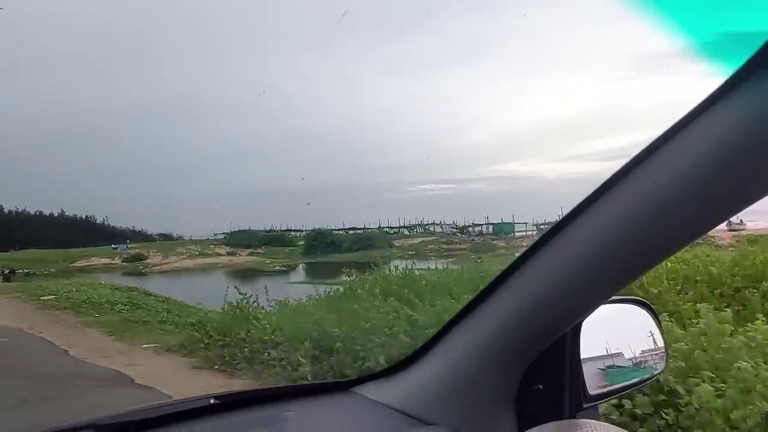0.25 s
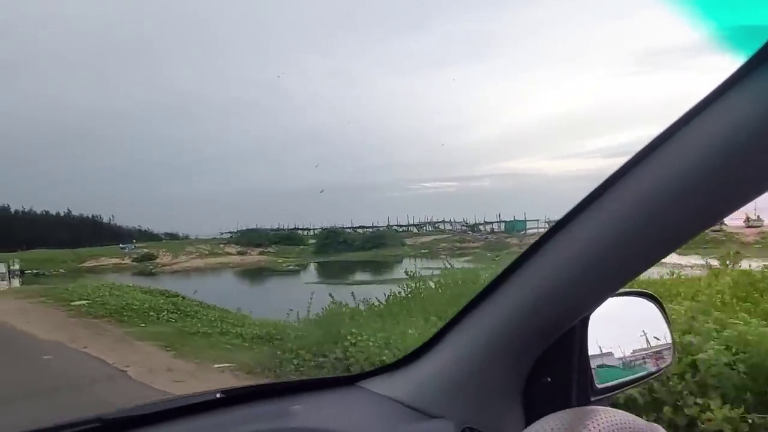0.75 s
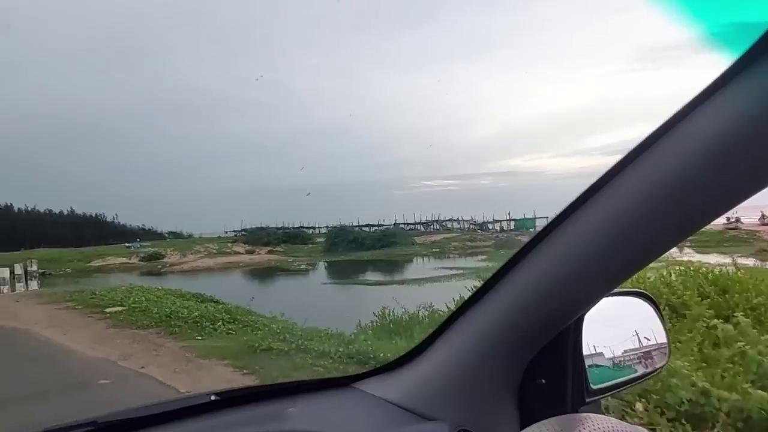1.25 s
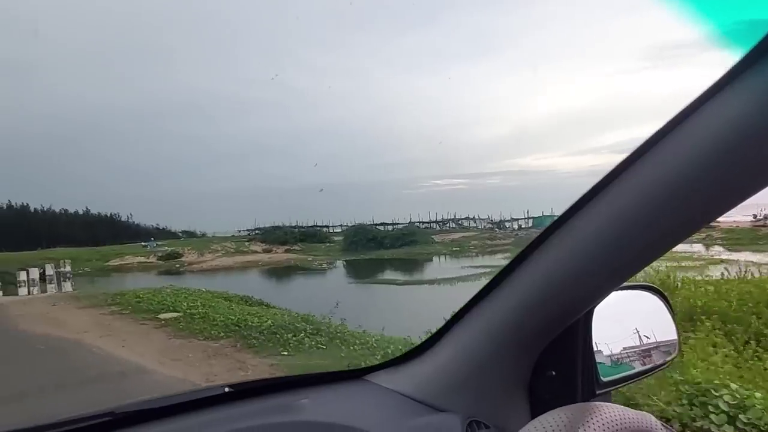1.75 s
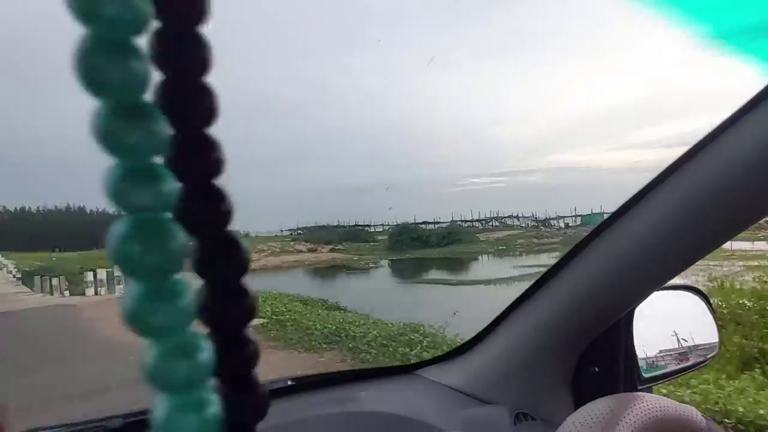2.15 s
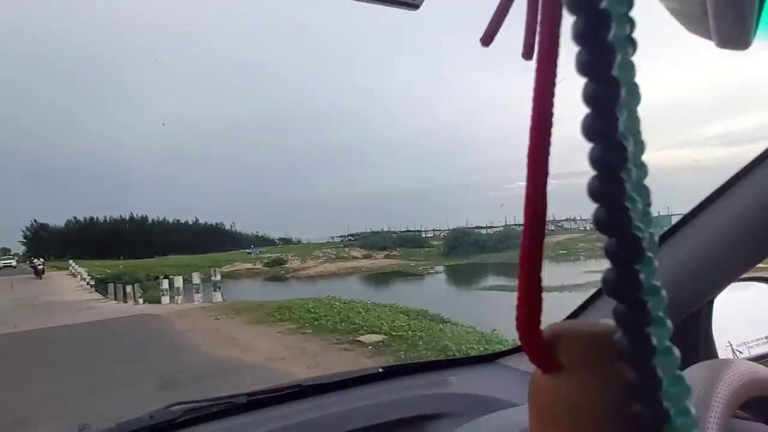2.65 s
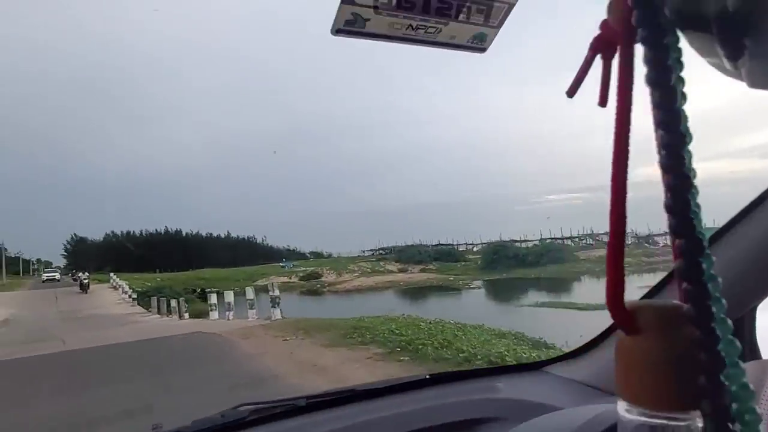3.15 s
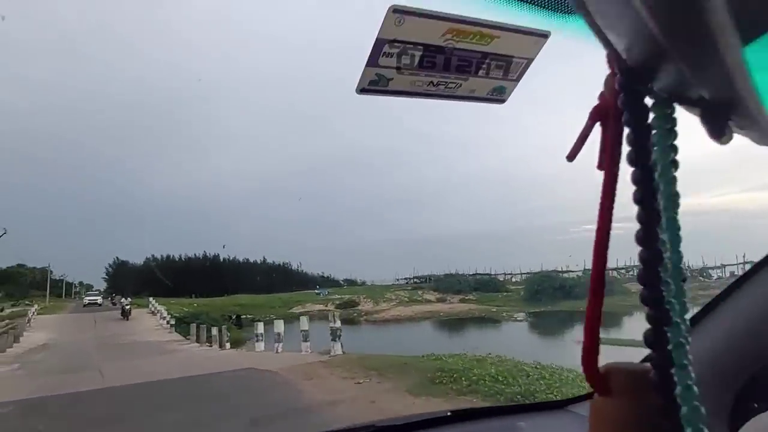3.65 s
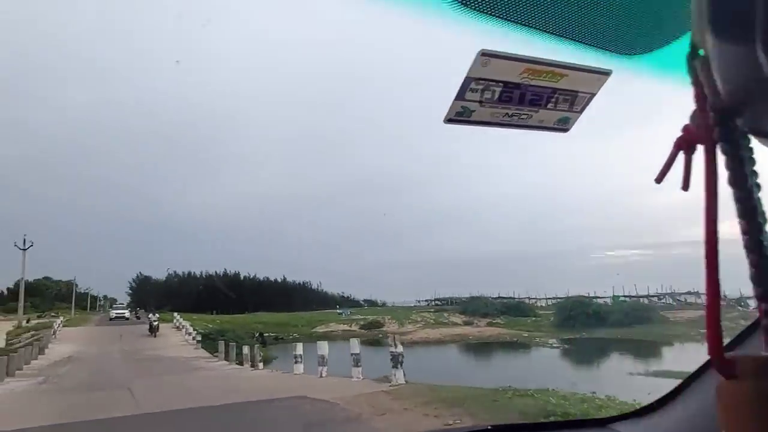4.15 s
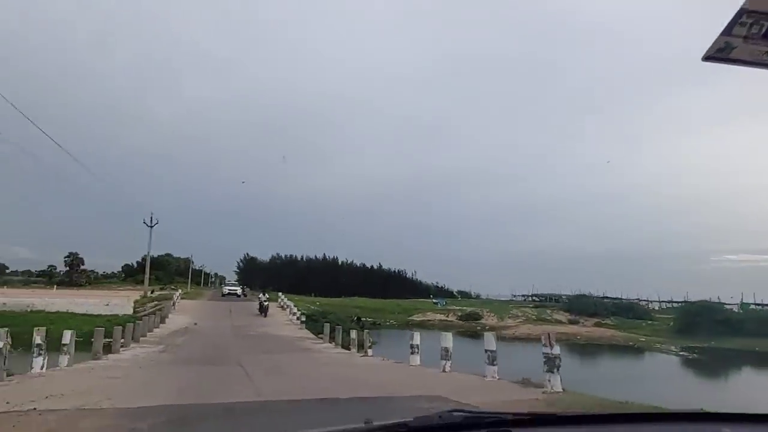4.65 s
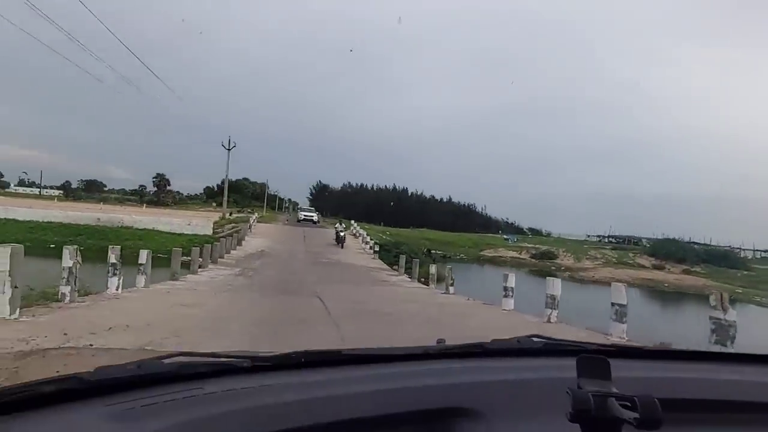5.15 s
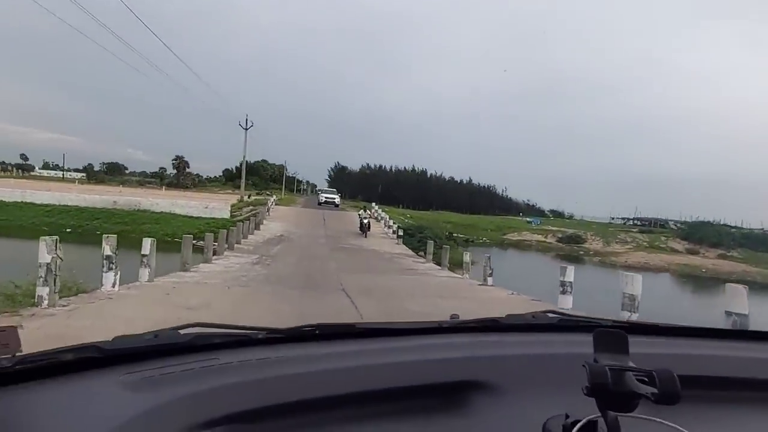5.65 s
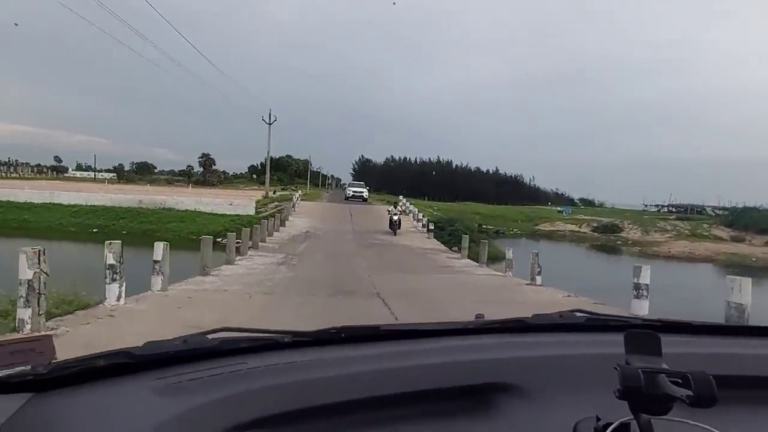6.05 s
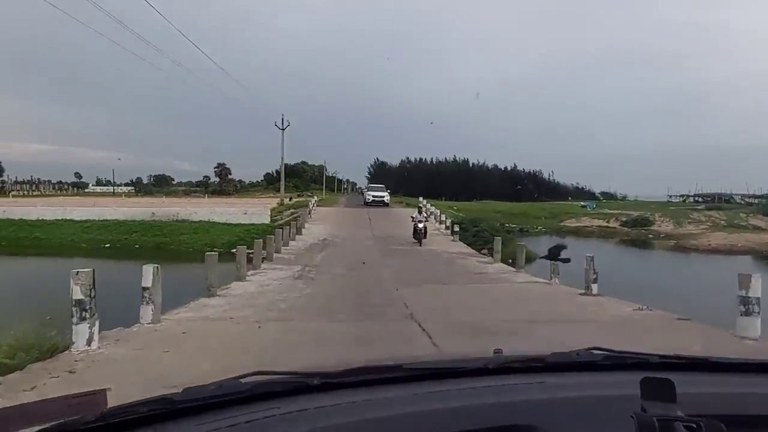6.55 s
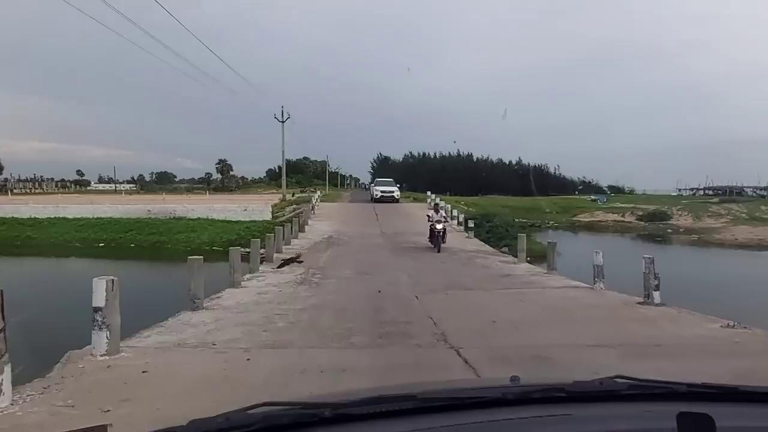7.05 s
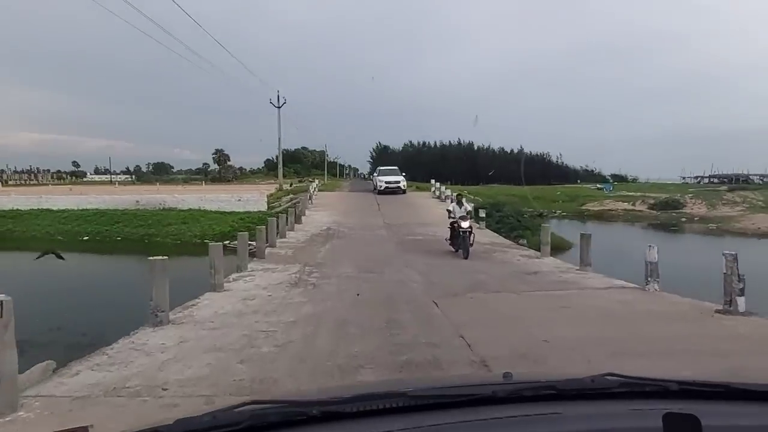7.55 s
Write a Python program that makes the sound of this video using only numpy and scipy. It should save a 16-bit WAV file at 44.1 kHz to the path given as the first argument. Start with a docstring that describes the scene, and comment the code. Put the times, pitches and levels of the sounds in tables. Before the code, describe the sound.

Inside a car rolling slowly onto a causeway, a deep engine drone sags in pitch under steady road rumble and faint air hiss, with barely audible soft chirps early. Around two and a half seconds a loud thump and rattle jolts the hand-held phone, and more knocks follow for over a second. The cabin then settles, the rumble returns stronger, and the engine climbs among dull bumps and brighter hiss.

```python
"""Inside a car rolling slowly along a causeway, heard by a hand-held phone.
Throughout, the engine drones in sines at multiples of its firing rate; the pitch sags, then climbs late on.
Filtered noise makes road rumble, tyre roar and air hiss. Soft sine chirps and a thin sizzle of hiss come
early; then knocks jolt the phone in falling thumps with rattle and crack, thinning out after the middle.
Trim ticks and rustles are puffs of noise; from past the middle a few faint whistles slide or hold."""
import sys
import numpy as np
from scipy import signal
from scipy.fft import rfft, irfft, next_fast_len
from scipy.io import wavfile
from scipy.ndimage import uniform_filter1d

SR = 44100
rng = np.random.default_rng(int(sys.argv[2]) if len(sys.argv) > 2 else 0)


def digitize_waveform(pressure):
    """Quantize a signal to 16-bit integers and store it at the path in sys.argv[1].

    Rows of a 2-D input are taken as channels; values are limited to [-1, 1].
    """
    field = np.atleast_2d(pressure).T
    bounded = np.clip(field, -1, 1)
    quanta = np.round(bounded * 32767).astype(np.int16)
    wavfile.write(sys.argv[1], SR, quanta)


N = 343539
T = np.arange(N) / SR  # time [s]

# course of the cabin noise, before each source's own share of it:
# (time [s], level [dB], extra treble level [dB])
CABIN_COURSE = [(0, 1.5, 0), (.55, -1, -0.5), (1.1, -0.5, 0.5), (2.45, -2, 3.5), (2.9, -5.5, 0.5),
                (3.5, -4.5, 1), (4.1, -5.5, -1), (4.85, -3.5, 0), (5.3, 0.5, 1.5), (6.4, 1.5, -1),
                (6.7, 1.5, 3.5), (7.4, 2, 5), (7.79, 3, 7.5)]


def undb(db):
    """Decibels to gain."""
    return 10 ** (np.asarray(db) / 20)


def walk(rate):
    """Random levels, rate of them per second, smoothed twice into slopes; spread near 1."""
    hold = int(SR / rate)
    steps = np.repeat(rng.standard_normal(N // hold + 1), hold)
    return 1.136 * uniform_filter1d(uniform_filter1d(steps, hold), hold)[:N]


def band(x, hz, width_hz):
    """Band-pass around a centre, its edges kept within a safe range."""
    low_hz = max(hz - width_hz / 2, 0.3 * hz)
    high_hz = min(hz + width_hz / 2, 0.45 * SR)
    return signal.sosfilt(signal.butter(2, [low_hz, high_hz], "bandpass", fs=SR, output="sos"), x)


def resonance(hz, mode_hz, width_hz, lift_db):
    """Lift in dB of a resonance, falling to half its dB at the edges of its width."""
    return lift_db / (1 + (2 * (hz - mode_hz) / width_hz) ** 2)


def add(out, s, sound):
    """Mix a short sound in at a time in seconds."""
    i = int(s * SR)
    out[i:i + len(sound)] += sound[:N - i]


def cabin_level():
    """Slow level course of the noise in the cabin, dB."""
    return np.interp(T, *np.transpose(CABIN_COURSE)[:2])


def engine(wander=0.003, scatter_db=1.5, follows=1.2):
    """Three multiples of the firing rate boom as they cross the cabin's air modes, wavering a little."""
    # engine speed, before its small wander: (time [s], firing rate [Hz])
    firing_rate = [(0, 73.87), (.7, 69.24), (1.4, 66.18), (2.5, 63.48), (3.1, 63.1), (4.7, 63.9),
                   (5.2, 65.23), (6.75, 65.78), (7.5, 72.9), (7.79, 72)]
    # levels of the 1st, 2nd and 3rd multiple away from any boom, before the slow course and scatter [dB]
    multiples_db = (-44.5, -43.5, -54)
    # cabin air modes that lift a multiple passing through them: (centre [Hz], width [Hz], lift [dB])
    air_modes = [(75.5, 8.1, 6), (130.85, 5.4, 11), (196.5, 12, 7.5)]
    hz = np.interp(T, *np.transpose(firing_rate))
    phase = 2 * np.pi * np.cumsum(hz * (1 + wander * walk(12))) / SR
    course_db = follows * cabin_level()
    out = np.zeros(N)
    for multiple, db in enumerate(multiples_db, 1):
        boom_db = sum(resonance(multiple * hz, *mode) for mode in air_modes)
        level_db = db + boom_db + course_db + scatter_db * walk(14)
        out += np.sqrt(2) * undb(level_db) * np.sin(multiple * phase + multiple - 1)
    return out


def cabin(road_db=-33.5, air_db=-69, swell_db=0.7, flicker_db=1.5):
    """Road and air noise, coloured by cabin resonances, in bands that swell together and flicker alone."""
    # colour of the road noise, set to its level below: (frequency [Hz], relative density [dB])
    road_colour = [(12, -37.5), (20, -8), (70, 3.5), (103, -4), (139, -1.5), (163, -6), (204, -6),
                   (230, -11.5), (374, -18), (406, -18), (608, -22.5), (910, -26), (1340, -34.5),
                   (1450, -33.5), (2500, -41), (3250, -76), (5500, -120)]
    # colour of the air hiss, set to its level below: (frequency [Hz], relative density [dB])
    air_colour = [(1500, -31), (2500, -10.5), (2820, -2.5), (3100, -7), (3540, -12.5), (4160, -10.5),
                  (4600, -12), (5700, -8.5), (6100, -13), (6400, -20.5), (7100, -25), (8400, -25.5),
                  (9300, -23), (10100, -26), (15700, -29.5)]
    # cabin resonances: (centre [Hz], width [Hz], lift [dB])
    panels = [(294.5, 16, 5), (342, 13, 3), (632, 12, 5), (721, 30, 5.5), (1058, 10, 5.5), (1324, 20, 7),
              (4250, 66, 2), (4900, 110, 3.5)]
    # centres of rumble, tyre roar, air hiss and top hiss [Hz]
    range_hz = (60, 600, 4000, 10000)
    # how far those four follow the level of the course [share]
    level_share = (0.83, 1.22, 0.89, 1.3)
    # how far those four follow its extra treble level [share]
    treble_share = (0.32, 0, 0.97, 0.061)
    size = next_fast_len(N)
    octave = np.log2(np.maximum(np.arange(size // 2 + 1) * SR / size, 1))
    colour = 0
    for table, db in ((road_colour, road_db), (air_colour, air_db)):
        table_hz, density_db = np.transpose(table)
        shape = undb(np.interp(octave, np.log2(table_hz), density_db))
        colour = np.hypot(colour, undb(db) * shape / np.sqrt(np.mean(shape ** 2)))
    for panel in panels:
        colour = colour * undb(resonance(2 ** octave, *panel))
    noise = colour * rfft(rng.standard_normal(size))

    s, level_db, treble_db = np.transpose(CABIN_COURSE)
    range_octave = np.log2(range_hz)
    out, swell = np.zeros(N), walk(5)
    for centre in np.arange(4, 14.6, 0.5):  # octaves above 1 Hz
        overlap = np.clip(1 - 2 * abs(octave - centre), 0, 1)  # neighbouring bands cross-fade
        rise_db = np.interp(centre, range_octave, level_share) * level_db
        rise_db = rise_db + np.interp(centre, range_octave, treble_share) * treble_db
        moving_db = np.interp(T, s, rise_db) + swell_db * swell + flicker_db * walk(11)
        out += undb(moving_db) * irfft(overlap * noise, size)[:N]
    return out


def knocks(glide=0.5, tail=1.64, rattle_db=-26, rattle_ms=14, contact_ms=0.43, crack_ms=1.94):
    """Each blow swings the microphone in a short falling thump, rattles the casing and cracks."""
    # blows on the phone: (time [s], thump peak [dB], settled thump pitch [Hz], rise to the peak [ms],
    # gain of the casing's ring [dB], gain of the crack [dB])
    blows = [(2.5415, 4, 124.6, 3.7, -13, -17.5), (2.584, -14.5, 197, 3.6, -22.5, -28),
             (2.5858, -37, 200, 3.5, -41, -31), (2.6175, -9, 145, 4.6, -29.5, -56),
             (2.656, -19.5, 99, 5.9, -44, -59), (2.7238, -16, 115, 4.3, -44.5, -59),
             (2.7810, -26, 222, 3.2, -40.5, -64), (3.3060, -3.5, 152, 3.1, -18, -33),
             (3.3132, -0.5, 151, 1.7, -38.5, -28.5), (3.3760, -10, 353, 1.6, -20, -40),
             (3.3825, -1.5, 107, 5.5, -34, -49), (3.406, -28, 244, 10.7, -37, -55),
             (3.5495, -10.5, 179.4, 6, -25.5, -52), (3.6685, 2, 140, 2.63, -20, -32),
             (3.672, -46, 200, 3, -36, -38.5), (3.706, -14.5, 204, 5, -42, -58),
             (3.7160, -12.5, 150.5, 6.2, -29, -66), (6.0193, -18.5, 230, 3.1, -27, -38),
             (6.0240, -16.5, 65, 8, -50, -70), (6.0858, -8.5, 191, 1.34, -23.5, -39),
             (7.502, -19.5, 62, 9.8, -29, -49), (7.554, -18, 85, 9.5, -34.5, -40),
             (7.623, -16.5, 100, 7.2, -32, -49)]
    # ringing modes of the casing, before each blow's gain: (frequency [Hz], level [dB], 60 dB decay [s])
    casing_modes = [(56.2, -2.5, 0.38), (314, 2.5, 0.054), (466, 0, 0.025), (679, -3.5, 0.024),
                    (882, -11, 0.019), (1790, -12, 0.018)]
    out, t = np.zeros(N), T[:SR // 8]
    noise = rng.standard_normal((len(blows), 2, len(t)))
    casing = sum(undb(db) * np.sin(2 * np.pi * hz * t) * undb(-60 * t / t60) for hz, db, t60 in casing_modes)
    casing *= 1 - np.exp(-1000 * t / contact_ms)  # a fingertip takes a moment to press
    for (s, db, hz, swell_ms, snap_db, crack_db), (hiss, chatter) in zip(blows, noise):
        u = 1000 * t / swell_ms
        cycles = hz * (t + glide * swell_ms / 1000 * (1 - np.exp(-u)))  # pitch starts high, then sags
        swing = u * np.exp((1 - u ** tail) / tail)
        thump = undb(db) * swing * np.sin(2 * np.pi * cycles)
        # the blow rings the casing once, then loose parts keep jostling it
        jostle = undb(rattle_db) * np.exp(-1000 * t / rattle_ms) * band(chatter, 554, 1200)
        snap = casing + signal.fftconvolve(casing, jostle)[:len(t)]
        bright_hiss = band(band(hiss, 3000, 4800), 3100, 7000)
        crack = undb(crack_db) * np.exp(-1000 * t / crack_ms) * bright_hiss
        add(out, s, crack - thump - undb(snap_db) * snap)
    return out


def rustles(width_share=0.92):
    """Ticks, rustles and rumbles of trim, cloth and floor: puffs of band noise with a quick rise."""
    # puffs: (time [s], level [dB], centre [Hz], length, twice the rise to the peak [ms])
    puffs = [(1.362, -59.5, 2700, 13), (2.142, -64, 5560, 10), (2.144, -38, 362, 17), (2.178, -69, 6070, 7),
             (2.546, -30, 1130, 7.2), (2.545, -56, 4100, 18), (2.545, -65, 8500, 4.7),
             (3.404, -37, 700, 21), (3.41, -71, 5500, 20), (3.797, -72, 4700, 4.3), (3.933, -54, 710, 7),
             (3.989, -47.5, 810, 5.8), (4.204, -54, 1690, 7.9), (4.308, -61.5, 5600, 18),
             (4.316, -54, 2100, 13), (5.491, -62, 3600, 14), (6.425, -58, 2600, 3.2),
             (6.438, -42.5, 517, 33), (6.454, -52, 2600, 7.8), (6.478, -55.5, 4370, 22),
             (6.607, -60, 5060, 4.5), (6.666, -67, 6500, 5), (6.814, -54, 4100, 4), (6.843, -51, 4960, 8),
             (7.403, -55.5, 3600, 17), (7.501, -47, 690, 49), (7.522, -24.5, 72, 51),
             (7.52, -70, 5850, 110), (7.534, -59.5, 4600, 5.5), (7.601, -23.5, 91, 56),
             (7.62, -46, 400, 23), (7.549, -43, 300, 30), (7.73, -28, 58, 96)]
    out, t = np.zeros(N), T[:SR // 2]
    noise = rng.standard_normal((len(puffs), len(t)))
    for (s, db, hz, ms), hiss in zip(puffs, noise):
        u = 2000 * t / ms
        width_hz = width_share * hz
        puff = band(band(hiss, hz, width_hz), hz, width_hz)
        add(out, s, undb(db) * u * np.exp(1 - u) * puff / puff.std())
    return out


def whistles(flutter_db=3, wobble=0.01, fade_db_per_s=15, glide_s=0.04, attack_s=0.0089, release_s=0.045):
    """Thin fading tones that slide to their last pitch, with a fluttering level and unsteady pitch."""
    # faint whistles, before wobble, flutter and fade:
    # (time [s], length [s], first pitch [Hz], last pitch [Hz], starting level [dB])
    tones = [(4.375, .29, 3540, 3190, -73), (6.435, .1, 4120, 4200, -72), (6.435, .1, 8240, 8400, -83),
             (7.025, .16, 4120, 4200, -73), (7.585, .1, 690, 693, -45), (7.7, .09, 690, 698, -50)]
    out, flutter = np.zeros(N), walk(110)
    for s, length, first_hz, last_hz, db in tones:
        since = np.maximum(T - s, 0)
        gate = np.clip(np.minimum((T - s) / attack_s, (s + length - T) / release_s), 0, 1)
        hz = last_hz + (first_hz - last_hz) * np.exp(-since / glide_s)
        tone = np.sin(2 * np.pi * np.cumsum(hz * (1 + wobble * walk(250))) / SR)
        level_db = db - fade_db_per_s * since + flutter_db * flutter
        out += np.sqrt(2) * gate * undb(level_db) * tone
    return out


def chirps(pitch_hz=1320, spread_hz=12, rise_ms=17):
    """Short soft sines near one pitch, each rising to its peak and dying away."""
    # faint chirps in the cabin noise: (time [s], peak level [dB])
    calls = [(.16, -60), (.34, -56), (.52, -63), (.67, -60), (.96, -54), (1.15, -56), (1.38, -59),
             (1.9, -59)]
    t = T[:SR // 8]
    out, u = np.zeros(N), 1000 * t / rise_ms
    for (s, db), tune in zip(calls, rng.standard_normal(len(calls))):
        tone = np.sin(2 * np.pi * (pitch_hz + spread_hz * tune) * t)
        add(out, s, undb(db) * u * np.exp(1 - u) * tone)
    return out


def sizzle(centre_hz=9280, level_db=-90, width_hz=900, wander_hz=60, waver_db=5.5, grain_db=3):
    """A narrow band of thin hiss: slow noise riding on a wandering centre; it dies away midway."""
    low_pass = signal.butter(2, width_hz / 2, fs=SR, output="sos")
    slow = signal.sosfilt(low_pass, rng.standard_normal((2, N)))
    phase = 2 * np.pi * np.cumsum(centre_hz + wander_hz * walk(2)) / SR
    db = level_db + waver_db * walk(3.5) + grain_db * walk(30)
    db = db - 49 * np.maximum(T - 3.2, 0)  # from 3.2 s it fades by 49 dB per second
    return undb(db) * (slow[0] * np.cos(phase) + slow[1] * np.sin(phase)) / slow.std()


def scene():
    """All sources at the one microphone."""
    return (engine() + cabin() + knocks() + rustles() + whistles() + chirps() + sizzle())[None]


def record(dry, top_hz=15700):
    """The phone rounds peaks near full scale and cuts the top."""
    rounded = dry / (1 + dry ** 6) ** (1 / 6)
    return signal.sosfilt(signal.ellip(8, 0.2, 70, top_hz, fs=SR, output="sos"), rounded)


dry = scene()
out = record(dry)
digitize_waveform(out)
```